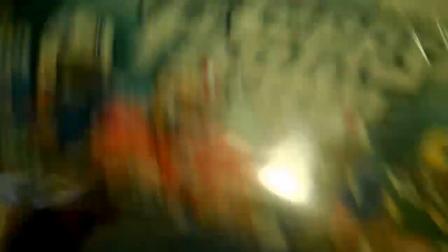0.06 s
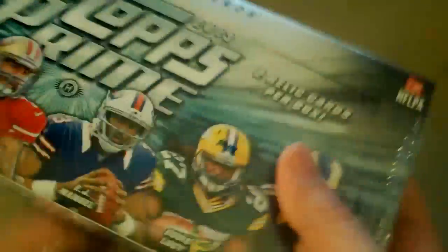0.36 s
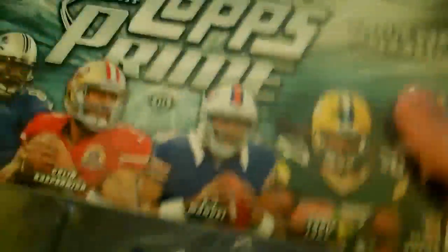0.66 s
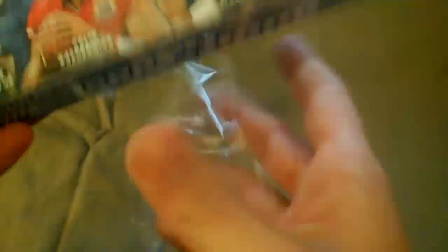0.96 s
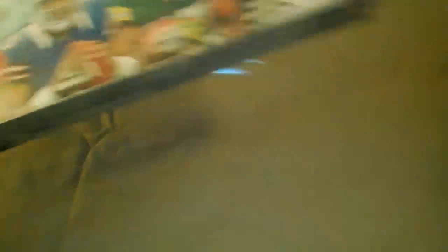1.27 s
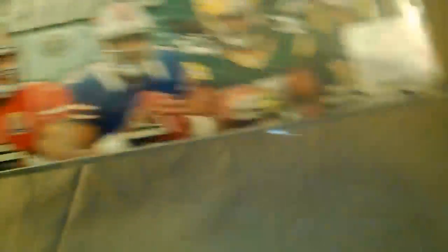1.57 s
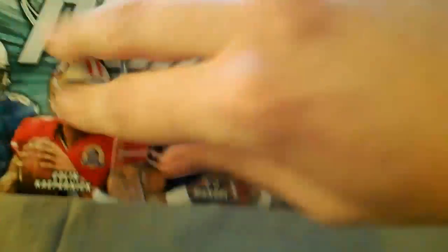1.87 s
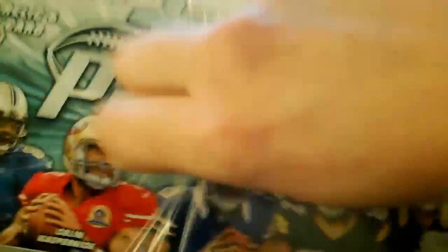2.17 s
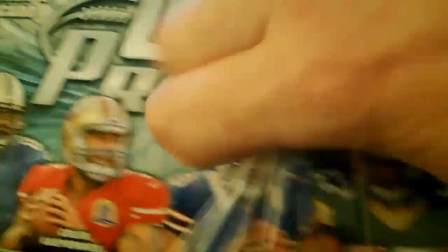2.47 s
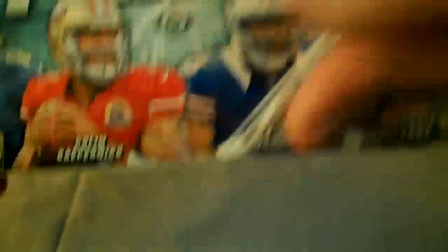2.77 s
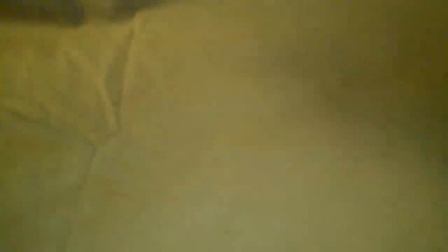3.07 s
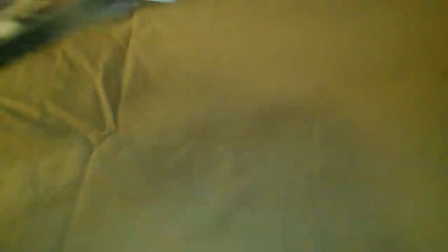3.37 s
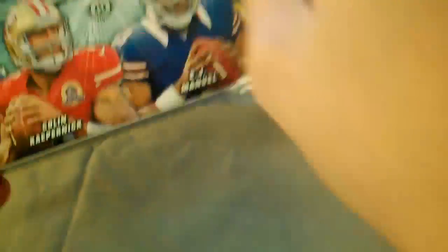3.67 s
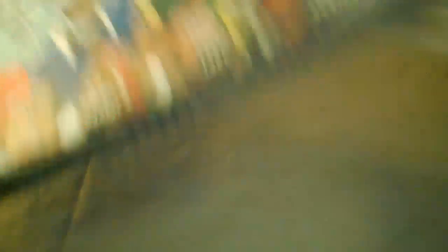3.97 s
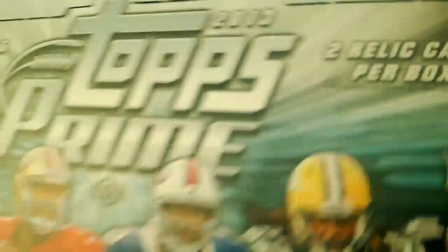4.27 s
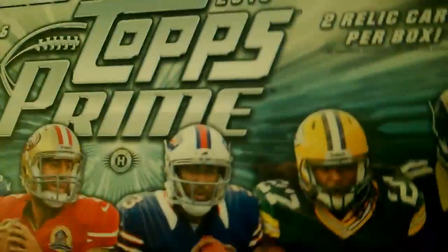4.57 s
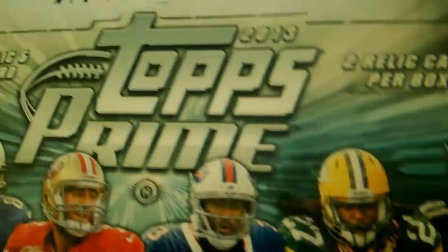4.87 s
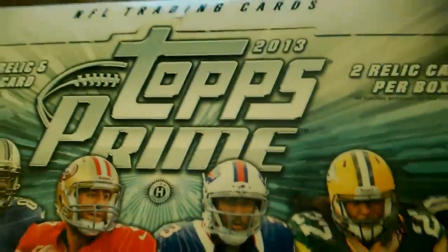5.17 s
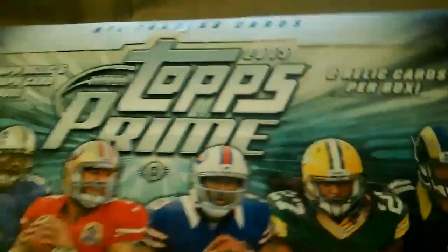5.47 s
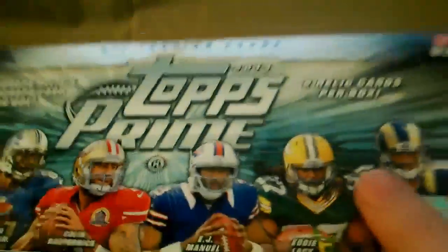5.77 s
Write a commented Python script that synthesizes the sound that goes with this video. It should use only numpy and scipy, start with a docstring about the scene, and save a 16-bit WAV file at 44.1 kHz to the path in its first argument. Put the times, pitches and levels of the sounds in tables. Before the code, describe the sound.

From the start, shrink wrap crinkles and snaps in uneven bursts as fingers pick at it, very close to the microphone, with the cardboard box sounding faintly underneath. The crackling eases a little between 1.5 and 2.3 seconds. Three short, sharp rips follow at about 2.4, 2.8 and 3.1 seconds, among the loudest snaps. From 3.1 to 4 seconds the box gives a few dull bumps, and a low wobbling rumble comes through the microphone stand around 3.4 seconds. The film then slides off with a hissy rustle and one brief, high squeak at about 4.1 seconds. The rustling fades after 5 seconds, and a few light crinkles and taps come near 5.8 seconds. A faint, steady electronic whine and a soft fan hum continue throughout. The room is quiet and furnished, with almost no echo.

```python
"""A quiet furnished room, a small camera on a stand, and a cardboard box right in front of its microphone.
Shrink wrap is picked at, torn and pulled off: creases snap and crackle as they buckle, three rips run
through the film, it squeaks as it slides, and the box rings underneath. Hand and box give a few dull
bumps and the stand wobbles. Behind it all, the camera's electronics whine over a soft fan."""
import sys
import numpy as np
from scipy import signal
from scipy.fft import rfft, irfft
from scipy.io import wavfile
from scipy.ndimage import uniform_filter1d

SR = 44100
rng = np.random.default_rng(int(sys.argv[2]) if len(sys.argv) > 2 else 0)


def wav_out(sig):
    """Save sig, one row per channel (or a flat mono array), as 16-bit PCM at SR to the path in sys.argv[1]."""
    wavfile.write(sys.argv[1], SR, np.round(np.clip(np.atleast_2d(sig).T, -1, 1) * 32767).astype(np.int16))


N = 265967
TIME = np.arange(N) / SR
SWELL_DEPTH_DB = 20.5  # a movement climbs this far over its rise and drops as far over its fall

# Finger strokes on the wrap, close to the microphone. Each row: peak time in seconds, level in dB, rise
# and fall in seconds, relative treble and box levels in dB, spread of slip sizes in dB (wide is
# buckling, narrow is sliding).
FINGER_STROKES = [(0.03, -39, .15, .15, 0, -4, 3.5), (0.115, -30, .08, 0.13, 0, -2.5, 3.5),
                  (0.225, -37, 0.018, .17, 5, -2, 3), (0.32, -33, .1, .1, 0, -5, 3.5),
                  (0.383, -24.5, .11, .2, -2, -8.5, 3.5), (0.531, -29, 0.083, 0.093, 2.5, -3, 3.5),
                  (0.645, -36, .1, .1, 0, -6, 4), (0.87, -41.5, .015, .1, -12, 0, 5),
                  (0.968, -35, .1, .08, -14, -3, 4), (1.015, -34, 0.022, .05, -5, 2.5, 4.5),
                  (1.079, -38, 0.072, .22, -4.5, -7.5, 3.5), (1.265, -26, .11, .2, -1, -7.5, 3),
                  (1.39, -25.5, .08, 0.057, 0.5, -13, 3.5), (1.6, -36.5, .02, 0.12, 1, -17, 4.5),
                  (1.658, -38.5, 0.064, .27, -1, -13.5, 4), (1.92, -40.5, 0.18, 0.13, -5, -26, 4.5),
                  (2.014, -32.5, 0.044, .08, -5, -4, 4), (2.246, -37, .28, .18, -4, -2, 3.5),
                  (2.38, -36, 0.13, .25, -3, -6, 4.5), (2.528, -34, .08, .1, -5, -9.5, 4.5),
                  (2.69, -31.5, .11, 0.25, -9, -8, 3), (2.831, -28, 0.21, .18, -8.5, -9.5, 2.5),
                  (3.048, -40.5, .25, .15, -1, -2, 3), (3.104, -26, .014, .04, -3, -5, 3),
                  (3.21, -29, 0.11, 0.17, -11, -13, 2), (3.273, -25.5, 0.093, 0.061, -5.5, -0.5, 3),
                  (3.501, -34, 0.09, .09, -6, -13, 3.5), (3.635, -41.5, 0.13, .1, -18, -12, 4),
                  (3.788, -42, 0.026, .45, 0.5, 0, 4.5), (4.011, -34, .16, 0.17, -2.5, 2.5, 3),
                  (4.108, -26.5, 0.17, 0.18, 0, -4, 2.5), (4.278, -37.5, .12, .15, 2, -5, 3),
                  (4.43, -44.5, .2, 0.34, 1, -21, 2.5), (4.595, -34.5, .1, 0.23, -2, -10.5, 2),
                  (4.82, -46, .15, 0.18, 0, -9, 2), (4.942, -36.5, .05, 0.1, 0, -6.5, 2.5),
                  (5.01, -38.5, .12, 0.26, -1.5, -7, 2), (5.56, -55, .06, .15, -13, 3.5, 4.5),
                  (5.834, -42, 0.046, 0.092, -18, 6.5, 3.5), (6.022, -49, 0.33, .2, -1, 3, 1.5)]

def handling(grip_db=-52, grip_treble_db=-7, grip_box_db=-7.5, grip_spread_db=4.5,
             let_go_s=4.8, release_s=0.43):
    """Strokes add in power to the grip's faint rustle; gives film, treble and box gains and slip spread."""
    grip = undb(grip_db - SWELL_DEPTH_DB * np.maximum(TIME - let_go_s, 0) / release_s) ** 2
    film, treble, card = grip, grip * undb(grip_treble_db) ** 2, grip * undb(grip_box_db) ** 2
    spread = grip * grip_spread_db
    for s, db, rise, fall, treble_db, box_db, spread_db in FINGER_STROKES:
        power = (undb(db) * swell(s, rise, fall, roundness=0.95)) ** 2
        film = film + power
        treble = treble + power * undb(treble_db) ** 2
        card = card + power * undb(box_db) ** 2
        spread = spread + power * spread_db
    return np.sqrt(film), np.sqrt(treble), np.sqrt(card), spread / film


# The tone of thin film at close range. Each row: frequency in Hz, gain in dB.
FILM_SPECTRUM = [(100, -18), (400, -23.5), (1000, -14), (1550, -10), (2100, -6), (3000, -3.5), (4500, -3),
                 (6000, -5), (8000, -5.5), (11000, -6.5), (16000, -13.5)]

def crackle(hands, base_rate=270, facet_q=2.2, click_db=-7, split_hz=7000, span_s=0.096):
    """Facets of all sizes buckle in small avalanches, each ringing at its own pitch, and shake the box."""
    film_gain, treble_gain, box_gain, spread_db = hands
    avalanche = undb(0.69 * spread_db * waver(0.0038))
    rate = base_rate * (1 + (3.5 / spread_db) ** 4)  # sliding makes many more slips than buckling
    film, push = 0, 0
    for hz in np.geomspace(1800, 13000, num=7):
        facet_spread_db = spread_db * (hz / 3500) ** 0.074  # smaller, higher facets slip more unevenly
        kicks = avalanche * unit(slips(N, rate, facet_spread_db))
        film = film + ring(kicks, hz, hz / facet_q) + undb(click_db) * kicks
        push = push + kicks
    film = colour(film, FILM_SPECTRUM)
    body = film_gain * steady(cut(film, split_hz, "low", order=4), span_s)
    treble = treble_gain * steady(cut(film, split_hz, "high", order=4), span_s)
    card = box_gain * steady(box(push), span_s)
    return undb(-2.67) * body + undb(-0.27) * treble + undb(-0.36) * card


# The loudest creases, right at the microphone. Each row: start in seconds, level in dB, ring pitch in Hz,
# relative box level in dB; both levels are trimmed in the mix.
LOUD_CREASES = [(0.0232, -23.5, 6260, -25), (0.0904, -19, 3330, -5.5), (0.2092, -18, 3900, -4),
                (0.2098, -12.5, 2020, -10), (0.2114, -13, 1250, -4), (0.351, -20, 4800, -23),
                (0.3676, -17, 4950, -28), (0.4468, -20, 3670, -22), (0.4713, -16, 4940, 1.5),
                (0.5265, -16, 5370, -14), (0.6559, -27, 5070, -15), (0.7041, -28, 4650, -29),
                (0.776, -32, 750, 1), (0.863, -28.5, 4400, 5), (0.915, -29, 9250, 4), (0.943, -27, 3700, 0),
                (0.9696, -23, 3840, 4), (1.0172, -29.5, 1220, 11.5), (1.057, -31, 4090, 0),
                (1.076, -28.5, 5430, -7), (1.1638, -24, 4240, -33), (1.3287, -17.5, 7880, -20),
                (1.3941, -14.5, 6600, -9.5), (1.5965, -28.5, 4400, -16), (1.7424, -30.5, 10770, -23),
                (1.9098, -22.5, 11260, -32), (1.92, -30, 7700, -32), (1.9269, -18.5, 5430, -14),
                (1.9884, -28, 2940, -18), (2.0126, -34, 5080, 10.5), (2.118, -25.5, 3050, -28),
                (2.2036, -24, 3500, -21), (2.2196, -22.5, 3800, -27), (2.2384, -22.5, 5800, -27),
                (2.32, -28, 1310, -0.5), (2.383, -4.5, 4170, -9.5), (2.3882, -14, 5200, -1),
                (2.6193, -11, 3520, -7), (2.716, -11.5, 2200, -13), (2.7399, -11, 4060, -24),
                (2.7658, -8.5, 4360, -34), (2.7912, -14.5, 4130, -6), (2.8313, -25, 7500, -15),
                (2.8469, -6.5, 4600, -37), (2.9027, -13.5, 6400, -15), (3.0202, -29.5, 1180, 3.5),
                (3.0515, -26.5, 2600, -17), (3.1054, -8.5, 5400, -10), (3.1316, -14.5, 4260, -2),
                (3.1622, -12.5, 3100, -5), (3.204, -24, 5080, -18), (3.2165, -16.5, 3260, -6),
                (3.639, -30, 3300, -28), (3.7287, -31, 3200, -6), (3.7706, -18, 1640, 0),
                (3.942, -25, 6450, -26), (4.005, -23, 5940, -23), (4.2569, -26.5, 2150, -3.5),
                (4.2924, -30, 1900, 3.5), (5.4875, -43, 6000, -18), (5.544, -44, 3800, 3),
                (5.697, -37.5, 5030, -8), (5.7741, -30, 4000, -1.5), (5.8198, -31, 1700, 2),
                (5.85, -25, 1750, 0)]

def snaps(creases, ring_cycles=13, crack_t60=0.007, settle_s=0.003, settle_db=-8, samples=4096):
    """A crease flips: a brief ring, a broad crack, a knock in the box, then a smaller flip as it settles."""
    out, t = np.zeros(N), np.arange(samples) / SR
    for s, db, hz, box_db in creases:
        gain = undb(db) * np.sqrt(0.003 * SR / samples)  # the energy of 3 ms at this level
        crack_noise, push_noise, settle_noise = rng.standard_normal((3, samples))
        # the facet and its neighbours across the crease ring together at unrelated pitches
        pitches = hz * np.array([1, rng.uniform(0.55, 0.85), rng.uniform(1.15, 1.5)])
        main, lower, upper = (np.sin(2 * np.pi * f * t) * fade(t, ring_cycles / hz) for f in pitches)
        facet = unit(main + undb(-12) * lower - undb(-13) * upper)
        # large, low facets flip slowly and crack duller; small ones radiate little below their pitch
        crack = colour(crack_noise * fade(t, crack_t60), FILM_SPECTRUM)
        crack = cut(crack, max(2.4 * hz, 7000), "low")
        crack = unit(cut(crack, 0.41 * hz, "high", order=4))
        film = unit(facet + undb(-2) * crack)
        # a finger pressing on the card pushes longer; only heavy snaps reach the low resonances
        push_t60 = np.interp(box_db, [-6, 2], [0.005, 0.018])
        lowest_hz = np.interp(db, [-22, -10], [560, 160])
        grip_shift = np.exp(0.078 * rng.standard_normal())
        knock = unit(cut(box(push_noise * fade(t, push_t60), grip_shift), lowest_hz, "high"))
        add(out, s, gain * (undb(-1) * film + undb(box_db - 2.5) * knock))
        settle = unit(ring(settle_noise * fade(t, crack_t60), hz, hz / 2))
        add(out, s + settle_s * (0.5 + rng.random()), gain * undb(settle_db) * settle)
    return out


def small_creases(hands, count=36, above_db=6, scatter_db=2, ring_hz=5400, box_db=-14, sliding_db=2.5):
    """Lesser creases flip at random while the film buckles, just above its rustle; gives rows for snaps."""
    film_gain, _, _, spread_db = hands
    odds = np.cumsum(np.sqrt(film_gain) * np.maximum(spread_db - sliding_db, 0))
    when, size, octaves = rng.uniform(-0.9, 1, (count, 3)).T
    at = np.searchsorted(odds, odds[-1] * (when + 1) / 2)
    levels_db = 20 * np.log10(film_gain[at]) + above_db + scatter_db * size
    return [(s, db, hz, box_db) for s, db, hz in zip(TIME[at], levels_db, ring_hz * 2 ** octaves)]


# Tears close to the microphone; the last two run together. Each row: start in seconds, level in dB, time
# at full pull and 60 dB decay time in seconds, ring pitch in Hz, relative box level in dB.
TEARS = [(2.3835, -16.5, 0.0035, 0.29, 5500, -9.5), (2.8484, -14.5, 0.0092, 0.28, 5200, -31),
         (3.105, -16.5, 0.0055, 0.11, 4050, 3), (3.128, -18, 0.043, 0.088, 3740, -5.5)]

def rips(rate=6000, spread_db=3, ring_width_hz=1100, span_s=0.038, dull_hz=9000, bright_t60=0.11):
    """A tear is a dense run of slips that dies away and dulls as the film goes slack."""
    out, t = np.zeros(N), np.arange(SR // 3) / SR
    for s, db, pull_s, t60, hz, box_db in TEARS:
        kicks = slips(len(t), rate, spread_db)
        slack_s = np.maximum(t - pull_s, 0)
        taut = colour(kicks + undb(2) * ring(kicks, hz, ring_width_hz), FILM_SPECTRUM)
        limp = signal.sosfiltfilt(signal.butter(1, dull_hz, fs=SR, output="sos"), taut)
        film = steady(limp + (taut - limp) * fade(slack_s, bright_t60), span_s)
        card = undb(box_db) * steady(box(kicks), span_s)
        add(out, s, undb(db) * fade(slack_s, t60) * (film + card))
    return out


# One near squeak as the film slides off the card. Each row: time in seconds, pitch in Hz, level in dB.
SQUEAK_PATH = [(4.08, 3080, -39), (4.1, 3130, -28), (4.125, 3300, -34), (4.146, 3490, -28),
               (4.175, 3400, -32.5), (4.195, 3050, -32), (4.22, 2850, -50)]

def squeak(roughness=0.65, waver_hz=160, jitter_s=0.00097):
    """Film sticks and slips on card, unsteady in pitch and level."""
    times, pitches, levels = np.transpose(SQUEAK_PATH)
    hz = np.interp(TIME, times, pitches) + waver_hz * waver(jitter_s)
    tone = np.sin(2 * np.pi * np.cumsum(hz) / SR) * (1 + roughness * waver(jitter_s))
    sliding = (TIME > times[0]) & (TIME < times[-1])
    return unit(tone) * undb(np.interp(TIME, times, levels)) * sliding


# The box's resonances under the film. Each row: frequency in Hz, width in Hz, gain in dB.
BOX_MODES = [(121, 150, -16.5), (258, 51, -6), (370, 173, -6.5), (460, 35, -3), (739, 240, -5),
             (878, 118, 2.5), (954, 285, -1), (1300, 122, 0), (1870, 1100, -9.5)]

def box(push, grip_shift=1):
    """The cardboard box answers a push on its wrap; the grip shifts its resonances."""
    return sum((-1) ** k * undb(db) * ring(push, hz * grip_shift, width)
               for k, (hz, width, db) in enumerate(BOX_MODES))


# Soft knocks of hand and box, close and dry. Each row: peak time in seconds, peak level in dB, pitch in Hz,
# half length in seconds.
SOFT_KNOCKS = [(2.389, -27.5, 95, 0.0039), (2.69, -33, 333, 0.0019), (3.107, -14, 265, 0.0035),
               (3.125, -17.5, 727, 0.011), (3.298, -34, 327, 0.013), (3.381, -33.5, 345, .013),
               (3.412, -36, 129, 0.025), (3.418, -20.5, 313, 0.0082), (3.502, -18, 318, 0.0047),
               (3.502, -40.5, 122, 0.042), (3.528, -39, 292, 0.026), (3.913, -33, 250, 0.0028),
               (3.979, -34, 169, 0.0065)]

def bumps(scuff_db=-14):
    """Padded knocks swell and fade, each a low tone with a little scuffing noise."""
    scuff = unit(ring(ring(rng.standard_normal(N), 260, 500), 280, 500))
    out = np.zeros(N)
    for s, db, hz, half_s in SOFT_KNOCKS:
        t = TIME - s
        bell = np.exp(-(t / half_s) ** 2 / 2)
        out += undb(db) * bell * (np.cos(2 * np.pi * hz * t) + undb(scuff_db) * scuff)
    return out


# Nudges to the stand under the microphone, each weaker than the last. Each row: peak time in seconds,
# level in dB, fall in seconds.
STAND_NUDGES = [(3.43, -19.5, 0.16), (3.68, -30, 0.21), (4.03, -45, .7)]

def stand_sway(sway_hz=26, rise_s=0.18, rumble_db=-15, rumble_hz=62, width_hz=45):
    """The nudged stand sways and rumbles far below the knocks."""
    gain = sum(undb(db) * swell(s, rise_s, fall, roundness=1.65) for s, db, fall in STAND_NUDGES)
    sway = unit(np.sin(2 * np.pi * sway_hz * TIME))
    rumble = unit(ring(ring(rng.standard_normal(N), rumble_hz, width_hz), rumble_hz, width_hz))
    return gain * (sway + undb(rumble_db) * rumble)


def room(x, echo_s=0.0045, echo_db=-17, tail_db=-19, t60=0.24):
    """A near surface throws back one quick echo; the furnished room adds a short, dull tail."""
    t = np.arange(SR // 3) / SR
    tail = colour(rng.standard_normal(len(t)), [(200, -5.5), (2500, 2.0), (7000, -12.5), (16000, -8.5)])
    tail *= fade(t, t60) * (t > echo_s)
    response = undb(tail_db) * tail / np.sqrt(np.sum(tail ** 2))
    response[int(echo_s * SR)] += undb(echo_db)
    return x + signal.fftconvolve(x, response)[:N]


# The camera's whine in its own microphone. Each row: harmonic number, rms level in dB.
WHINE_HARMONICS = [(1, -53), (2, -55), (3, -59), (5, -63), (6, -63.5)]

def camera_whine(hz=1966.8, frame_hz=30, chirp_db=-50):
    """The electronics hold one pitch; its fourth harmonic switches on and off with each picture frame."""
    phase = 2 * np.pi * hz * TIME
    whine = sum(undb(db) * unit(np.sin(k * phase)) for k, db in WHINE_HARMONICS)
    frame_on = np.cos(2 * np.pi * (frame_hz * TIME + 0.313)) > -0.15
    gate = uniform_filter1d(frame_on.astype(float), size=60)
    return whine + undb(chirp_db) * unit(np.sin(4 * phase)) * gate


# A soft fan in the background of the room. Each row: frequency in Hz, relative level in dB.
FAN_SPECTRUM = [(20, 8.5), (45, -1.5), (120, -2.5), (190, -4), (240, 12.5), (300, 4), (700, -5),
                (1500, -5.5), (2000, -5), (2800, -11), (3800, -8), (5500, -18), (9000, -16), (16000, -16)]

def fan(level_db=-50.5):
    """A steady rush of air with a hum near 240 Hz."""
    return undb(level_db) * unit(colour(rng.standard_normal(N), FAN_SPECTRUM, size=4096))


def slips(n, rate, spread_db):
    """Random tiny releases of tension, about rate a second: many small, a few large."""
    size = undb(np.minimum(rng.exponential(size=n), 6) * spread_db)
    return (rng.random(n) < rate / SR) * size * rng.choice([-1, 1], n)


def swell(s, rise, fall, roundness):
    """Gain of a movement that builds to its peak at time s and lets go; roundness 1 is pointed, 2 a bell."""
    away = np.maximum((s - TIME) / rise, (TIME - s) / fall)
    gain, near = np.zeros(N), away < 4
    gain[near] = undb(-SWELL_DEPTH_DB * away[near] ** roundness)
    return gain


def waver(span_s):
    """Smooth noise of rms 1 that changes within about span_s."""
    n = max(int(span_s * SR), 2)
    return unit(uniform_filter1d(uniform_filter1d(rng.standard_normal(N), n), n))


def steady(x, span_s):
    """Even out the slow level and keep the fast grain."""
    power = uniform_filter1d(uniform_filter1d(x ** 2, int(span_s * SR)), int(span_s * SR / 2))
    return x / np.sqrt(np.abs(power) + 1e-12)


def colour(x, points, size=1024):
    """Minimum-phase filter through (Hz, dB) points, so that clicks keep their sharp front."""
    hz, db = np.transpose(points)
    grid = np.maximum(np.fft.rfftfreq(size, 1 / SR), 1)
    cepstrum = irfft(np.log(undb(np.interp(np.log(grid), np.log(hz), db))))
    cepstrum[1:size // 2] *= 2
    cepstrum[size // 2 + 1:] = 0
    return signal.fftconvolve(x, irfft(np.exp(rfft(cepstrum))))[:len(x)]


def ring(x, hz, width_hz):
    """One resonance, gain 1 at its centre."""
    return signal.lfilter(*signal.iirpeak(min(hz, 0.45 * SR), hz / width_hz, fs=SR), x)


def cut(x, hz, kind, order=2):
    """Low-pass or high-pass."""
    return signal.sosfilt(signal.butter(order, min(hz, 0.45 * SR), kind, fs=SR, output="sos"), x)


def fade(t, t60):
    """Exponential decay, 60 dB down after t60."""
    return np.exp(-np.log(1000) * t / t60)


def add(track, s, sound):
    """Mix a sound in at time s."""
    i = min(int(s * SR), N)
    track[i:i + len(sound)] += sound[:N - i]


def undb(db):
    """Decibels to gain."""
    return 10 ** (np.asarray(db) / 20)


def unit(x):
    """Scale to rms 1."""
    return x / np.sqrt(np.mean(x ** 2) + 1e-18)


def scene():
    """One microphone: wrap and box up close, bumps and sway below them, whine and fan behind."""
    hands = handling()
    wrap = crackle(hands) + snaps(LOUD_CREASES + small_creases(hands)) + rips() + squeak()
    wrap = cut(wrap, 55, "high")  # the wrap sounds are cut below 55 Hz
    return (room(wrap) + stand_sway() + bumps() + camera_whine() + fan())[None]


def record(dry):
    """The sharpest snaps overload the microphone; the top is cut at 15.9 kHz."""
    top_cut = signal.ellip(8, 0.2, 70, 15900, fs=SR, output="sos")
    return signal.sosfilt(top_cut, np.clip(dry, -1, 1))


dry = scene()
out = record(dry)
wav_out(out)
```